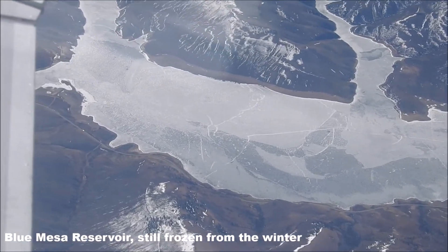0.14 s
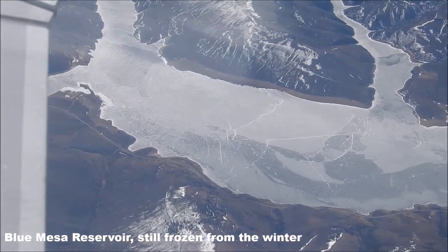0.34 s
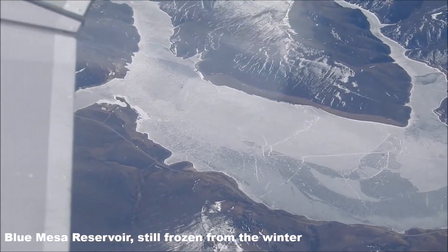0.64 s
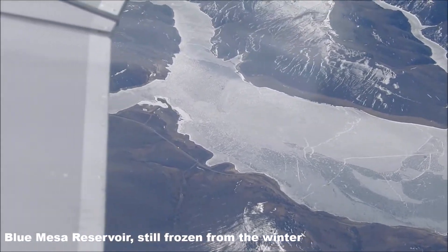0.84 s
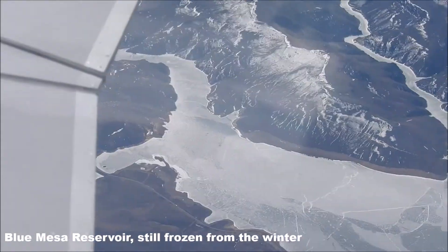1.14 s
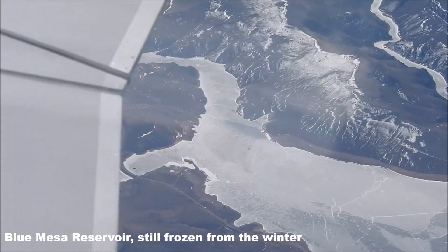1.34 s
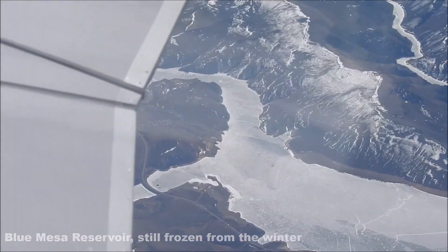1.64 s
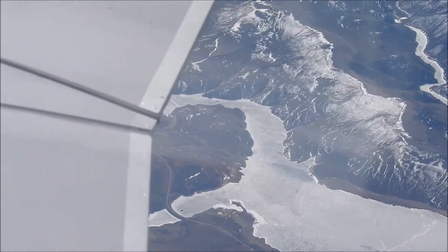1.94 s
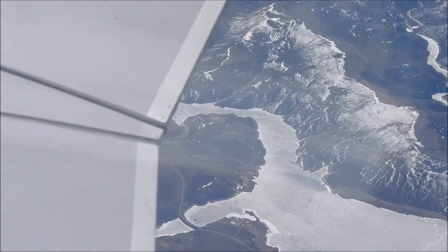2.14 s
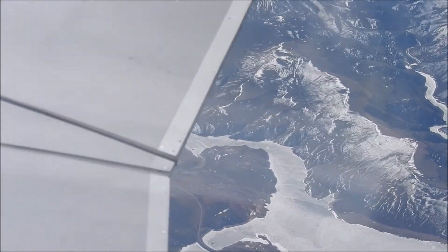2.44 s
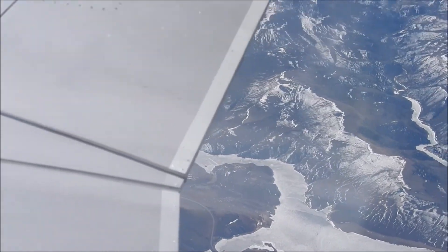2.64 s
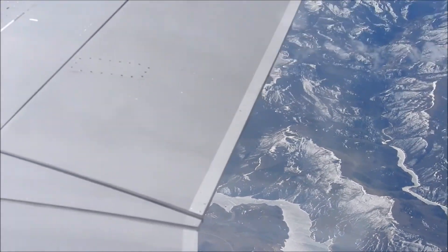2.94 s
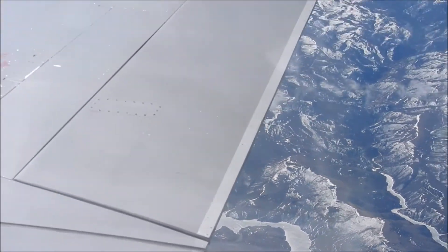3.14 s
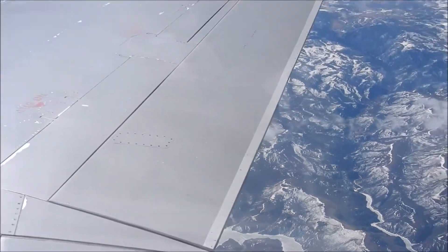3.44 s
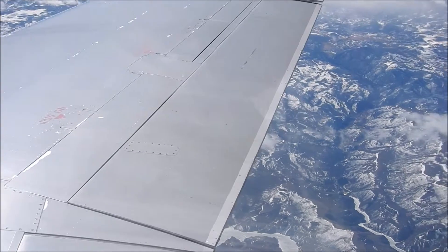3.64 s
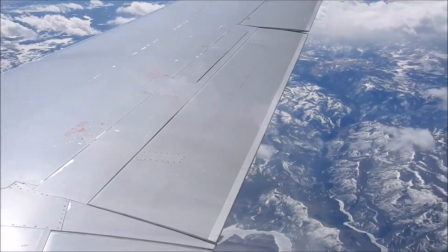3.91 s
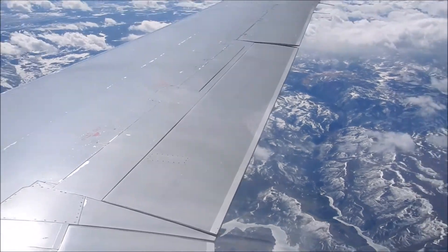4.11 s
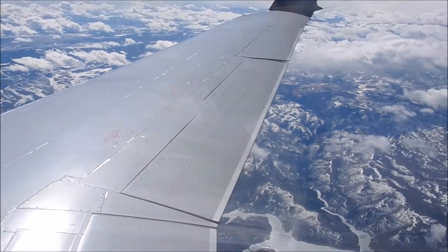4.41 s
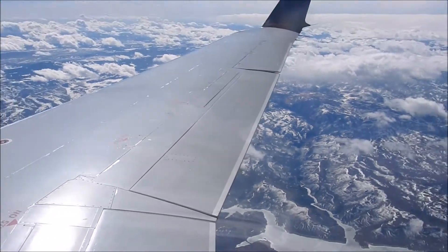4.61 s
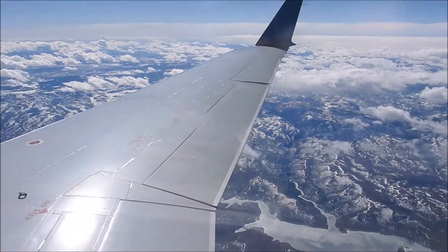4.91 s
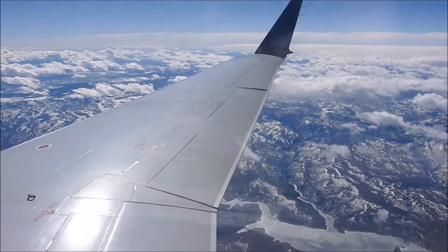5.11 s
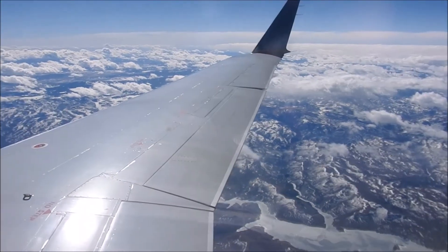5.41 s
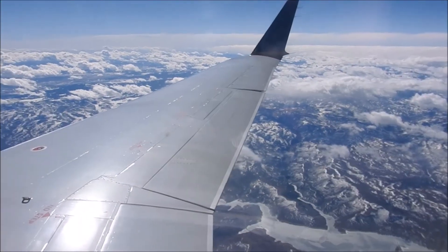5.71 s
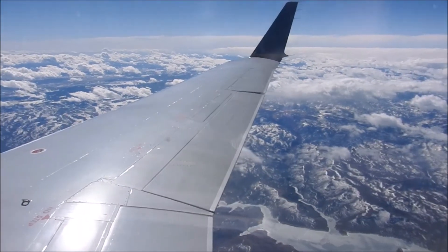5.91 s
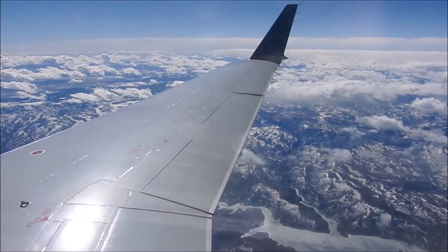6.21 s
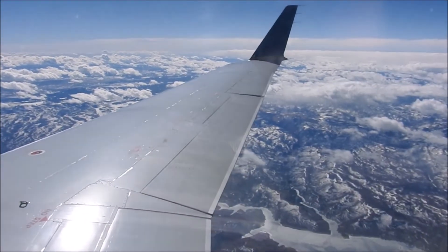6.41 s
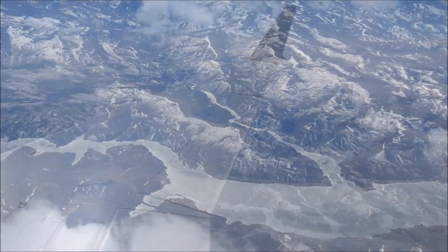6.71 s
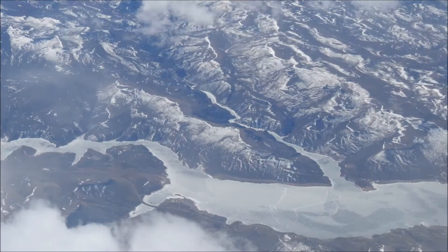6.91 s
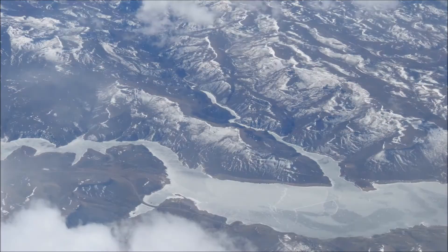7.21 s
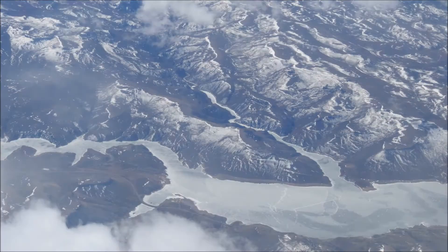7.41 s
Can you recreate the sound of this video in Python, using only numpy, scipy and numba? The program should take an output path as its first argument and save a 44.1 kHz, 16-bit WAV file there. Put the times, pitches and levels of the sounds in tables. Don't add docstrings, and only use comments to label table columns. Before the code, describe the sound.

Inside a small jet at cruise, a loud, dense low drone fills the cabin: two steady engine hums, rumbling hull and a softer rush of air and vent hiss. Overloaded peaks add a fine crackle. After nearly three seconds it fades evenly, with two short creaks from the handheld camera late in the fade, then silence.

```python
import sys
import numpy as np
from scipy import signal
from scipy.fft import rfft, irfft, next_fast_len
from scipy.io import wavfile
from scipy.ndimage import uniform_filter1d
from numba import njit

SR = 44100
rng = np.random.default_rng(int(sys.argv[2]) if len(sys.argv) > 2 else 0)


def store_pcm(level_fs):
    pcm = np.round(np.clip(level_fs, -1, 1) * 32767).astype(np.int16)
    wavfile.write(sys.argv[1], SR, np.atleast_2d(pcm).T)


def attenuation_scalar(level_db):
    decades = np.asarray(level_db, float) / 20
    return 10 ** decades


N = 332955

# (frequency [Hz], rms level [dB])
SHAFT_TONES = [(101.83, -16.5), (256.24, -14), (305.5, -33.5), (512.5, -34.5), (6790, -70.5)]
# (frequency [Hz], density [dB per Hz])
HULL_RUMBLE = [(12, -58.5), (20, -25), (48, -22), (91, -6.5), (117, -1.5), (151, -9.5), (205, -8.5),
               (252, -5.5), (310, -11), (393, -5.5), (567, -15.5), (654, -11), (900, -18), (1170, -62.5),
               (1980, -120)]
# (frequency [Hz], density [dB per Hz])
AIR_RUSH = [(530, -24), (900, -2), (1400, -9), (1520, -8.5), (1750, -13), (2050, -13.5), (2540, -19),
            (3180, -22), (3630, -28.5), (4550, -25.5), (5440, -30), (6350, -27), (9070, -44.5),
            (14100, -48.5), (15500, -49)]
# (frequency [Hz], width [Hz], boost [dB])
PANEL_MODES = [(65.93, 4, 6.5), (130.1, 25, 1), (182.5, 34, 7), (208.9, 20, 4.5), (386.6, 110, -0.5),
               (648, 32, 2.5), (2027, 290, 4.5), (3745, 31, 5), (4520, 300, 2), (6520, 150, 2)]
# (frequency [Hz], level re common part [dB])
MIC_DIFFERENCE = [(60, -41.5), (300, -36.5), (640, -21), (1300, -8.5), (2300, -13), (3300, -11.5),
                  (4400, -9), (6000, -0.5), (6800, -2.5), (8500, -14), (15000, -17.5)]
# (time [s], level [dB])
CREAKS = [
    (5.8145, -6),
    (6.306, -6.5),
]


def level(x, rms_db):
    return x * attenuation_scalar(rms_db) / np.sqrt(np.mean(x ** 2))


def curve_db(table, hz):
    table_hz, table_db = np.transpose(table)
    return np.interp(np.log(hz + 1e-9), np.log(table_hz), table_db, left=-90, right=-90)


def walk(rate_hz):
    hold = int(SR / rate_hz)
    steps = np.repeat(rng.standard_normal(N // hold + 1), hold)
    slewed = uniform_filter1d(uniform_filter1d(steps, hold), hold)
    return 1.3 * slewed[:N]


def hull_air(spectrum, rms_db, flicker_db, swell_db):
    size = next_fast_len(N)
    hz = np.arange(size // 2 + 1) * SR / size
    panels_db = sum(boost_db / (1 + (2 * (hz - mode_hz) / width_hz) ** 2)
                    for mode_hz, width_hz, boost_db in PANEL_MODES)
    gain = attenuation_scalar(curve_db(spectrum, hz) + panels_db)
    common, apart = rfft(rng.standard_normal((2, size))) * gain
    difference = apart * attenuation_scalar(curve_db(MIC_DIFFERENCE, hz))
    pair = common + difference * np.array([[1], [-1]])
    octave = np.log2(hz / 20 + 1e-9)
    out = 0
    for k in range(11):
        share = np.clip(1 - abs(octave - k), 0, 1)
        if np.max(share * gain) > 1e-3:
            band = irfft(pair * share, size)[:, :N]
            out = out + band * attenuation_scalar(swell_db + flicker_db * walk(14))
    return level(out, rms_db)


def camera_creaks(slips=9, gap_s=.00487, jitter_s=.0005, scatter_db=1.5, body_low_hz=800, body_high_hz=3200):
    drops = np.zeros(N)
    for start_s, creak_db in CREAKS:
        late, size = rng.standard_normal((slips, 2)).T
        jitter = jitter_s * late * np.sin(np.linspace(0, np.pi, slips))
        slip_s = start_s + gap_s * np.arange(slips) + jitter
        drops[(slip_s * SR).astype(int)] = -attenuation_scalar(creak_db + scatter_db * size)
    relax = signal.butter(1, body_low_hz, "high", fs=SR, output="sos")
    body = signal.butter(2, body_high_hz, fs=SR, output="sos")
    return signal.sosfilt(body, signal.sosfilt(relax, np.cumsum(drops)))


def engine_shafts(wobble_db=1.4, drift_rad=0.17):
    t = np.arange(N) / SR
    hum = np.zeros(N)
    for hz, rms_db in SHAFT_TONES:
        strength = np.sqrt(2) * attenuation_scalar(rms_db + wobble_db * walk(6))
        phase = 2 * np.pi * (hz * t + rng.random()) + drift_rad * walk(7.3)
        hum += strength * np.sin(phase)
    return hum


def scene():
    right_db = 1.0
    swell_db = .4 * walk(0.62)
    air = hull_air(HULL_RUMBLE, -14, 0.8, swell_db) + hull_air(AIR_RUSH, -28.5, 0.74, swell_db)
    cabin = air + camera_creaks() + engine_shafts()
    return cabin * attenuation_scalar(np.array([[-right_db], [right_db]]) / 2)


@njit
def stepped_gain(x, soft, soft_step, hard, hard_step, recover, poll, hold):
    y, gain, since, biting = np.empty_like(x), .5, 1e9, False
    for i in range(x.shape[1]):
        y[0, i], y[1, i] = gain * x[0, i], gain * x[1, i]
        peak = max(abs(y[0, i]), abs(y[1, i]))
        since += 1
        watched = since % poll == 0 or since < hold or peak > hard
        biting = peak > soft and (biting or watched)
        if biting:
            gain, since = gain * soft_step, 0.
        if peak > hard:
            gain *= hard_step
        if since > hold:
            gain = min(gain * recover, 1.)
    return y


def level_control(x):
    drive_db, poll_samples, hold_s, recover_db_per_s = 5., 19, .0017, 1051
    soft_top, soft_step_db = .49, -.32
    hard_top, hard_step_db = .97, -.9
    held = stepped_gain(x * attenuation_scalar(drive_db), soft_top, attenuation_scalar(soft_step_db), hard_top, attenuation_scalar(hard_step_db),
                        attenuation_scalar(recover_db_per_s / SR), poll_samples, hold_s * SR)
    return np.clip(held, -1, 1)


def fade_out():
    fade_from_s, fade_to_s, cut_s, onset_s = 2.72, 6.795, 6.752, 0.00053
    t = np.arange(N) / SR
    fade = np.clip((fade_to_s - t) / (fade_to_s - fade_from_s), 0, 1)
    return fade * (t < cut_s) * np.clip(t / onset_s, 0, 1)


def low_pass(x):
    return signal.sosfilt(signal.butter(12, 15720, fs=SR, output="sos"), x)


def record(dry):
    mix = level_control(dry) * fade_out()
    return low_pass(mix)


dry = scene()
out = record(dry)
store_pcm(out)
```